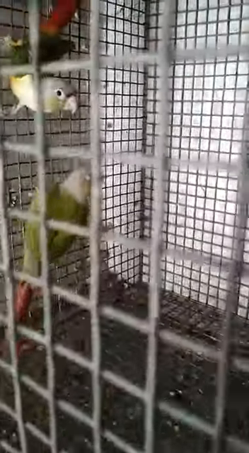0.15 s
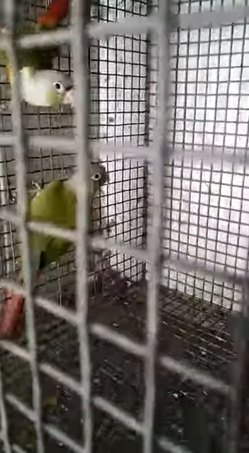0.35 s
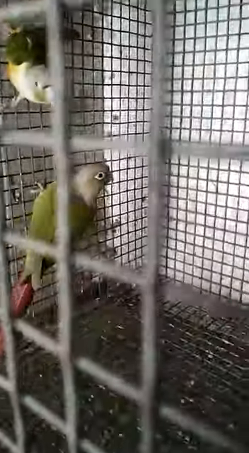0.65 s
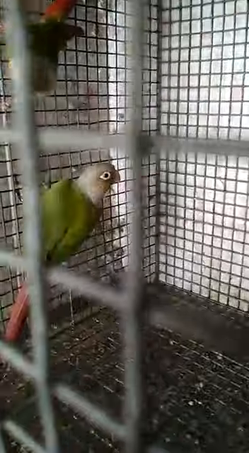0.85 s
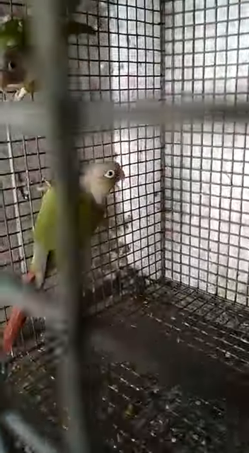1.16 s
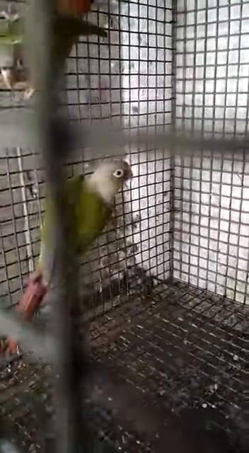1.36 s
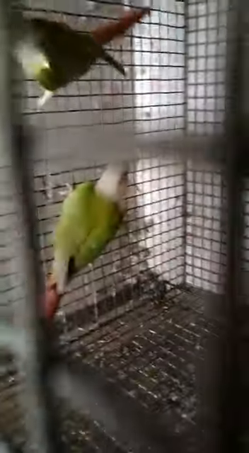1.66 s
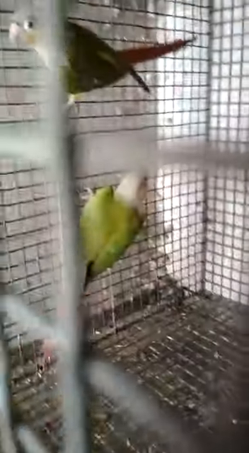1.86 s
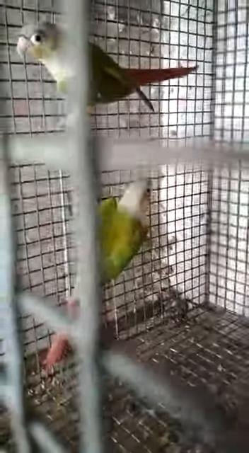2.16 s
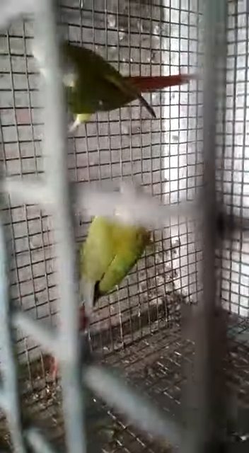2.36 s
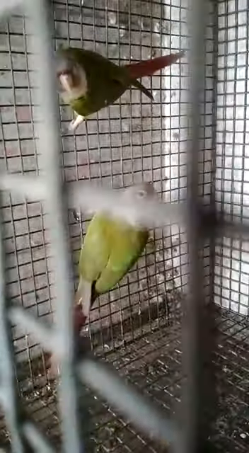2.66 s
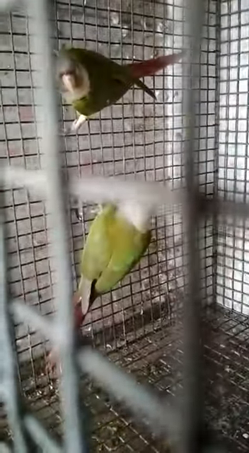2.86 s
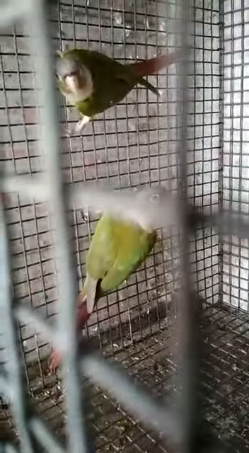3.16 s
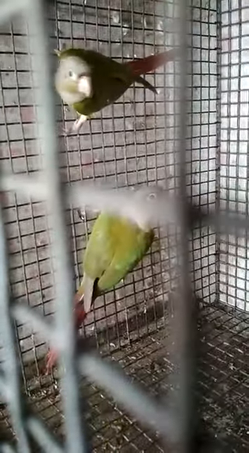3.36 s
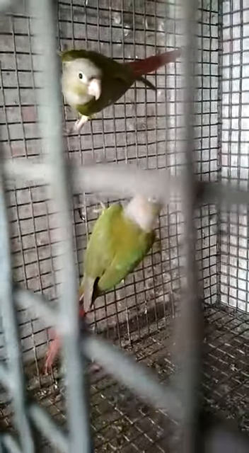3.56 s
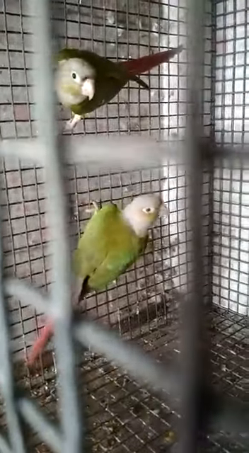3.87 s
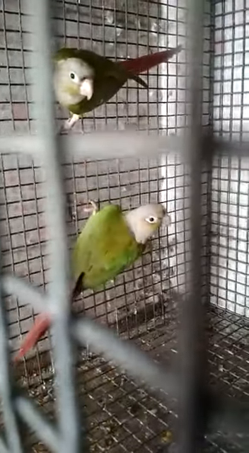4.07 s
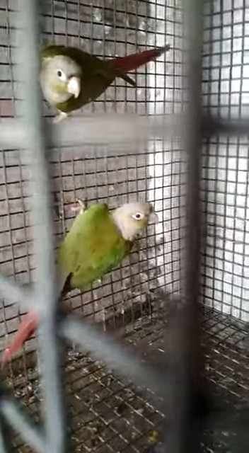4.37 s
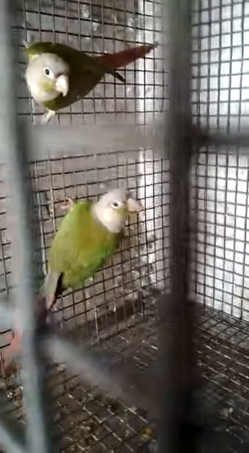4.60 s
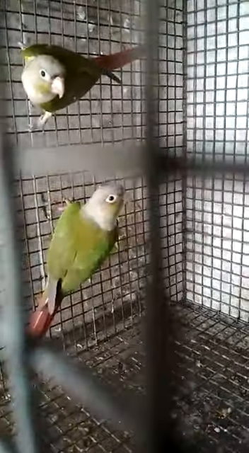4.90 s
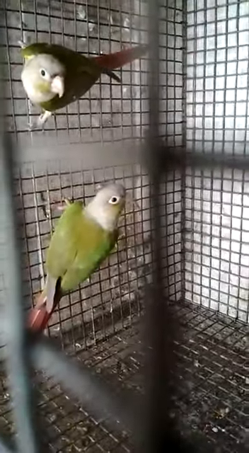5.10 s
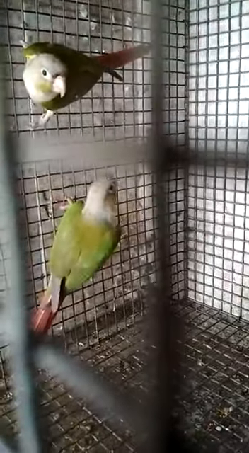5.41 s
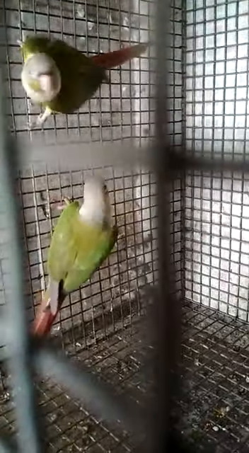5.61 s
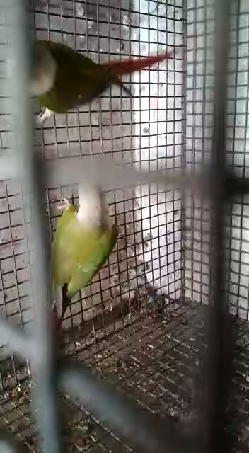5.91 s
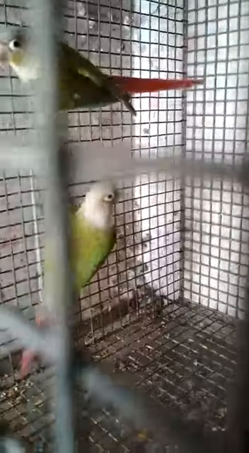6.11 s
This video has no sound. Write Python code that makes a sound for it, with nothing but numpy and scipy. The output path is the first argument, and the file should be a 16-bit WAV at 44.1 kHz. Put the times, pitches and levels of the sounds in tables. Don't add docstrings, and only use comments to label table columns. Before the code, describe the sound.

Two small caged parrots fire off rapid, piercing, raspy squawks very close, then quiet to distant flock chatter over a low fan hum.

```python
import sys
import numpy as np
from scipy import signal
from scipy.fft import rfft, irfft, next_fast_len
from scipy.io import wavfile
from scipy.ndimage import uniform_filter1d, minimum_filter1d, map_coordinates

SR = 44100
rng = np.random.default_rng(int(sys.argv[2]) if len(sys.argv) > 2 else 0)


def bounce(signal):
    frames = np.transpose(np.atleast_2d(signal))
    limited = np.clip(frames, -1, 1)
    pcm = np.round(limited * 32767).astype(np.int16)
    wavfile.write(sys.argv[1], SR, pcm)


def volts_from_db(level):
    exponent = np.asarray(level, float) / 20
    return 10 ** exponent


N = 275625


def unit(x):
    return x / np.sqrt(np.mean(x ** 2) + 1e-20)


def along(points, hz):
    f, v = np.transpose(points)
    return np.interp(np.log(hz + 1), np.log(f + 1), v)


def curve(rows):
    s, value = np.transpose(rows)
    return np.interp(np.arange(N) / SR, s, value)


def swells(rows, rise, fall, rest_db=-80):
    t = np.arange(0, N / SR + .002, .002)
    s, held, db = np.transpose(rows)[..., None]
    before, after = np.clip(s - t, 0, None), np.clip(t - s - held, 0, None)
    level_db = np.max(db - rise * before - fall * after, axis=0)
    return curve(np.transpose([t, np.maximum(level_db, rest_db)]))


def wobble(size, rate):
    return map_coordinates(rng.standard_normal(int(size * rate / SR) + 4), [np.arange(size) * rate / SR])


def filtered(x, response):
    n = x.shape[-1]
    m = next_fast_len(n + 8192)
    return irfft(rfft(x, m) * response(np.fft.rfftfreq(m, 1 / SR)), m)[..., :n]


def syrinx(hz, rasp, first_db=0):
    n = len(hz)
    jitter = (.007 + 0.076 * rasp ** 2) * wobble(n, 600)
    phase = 2 * np.pi * np.cumsum(hz * (1 + jitter)) / SR
    lines = 0
    for k in range(1, 7):
        level_db = (4.0 * rasp + 0.54 * k) * wobble(n, 380) + first_db * (k == 1)
        lines = lines + volts_from_db(level_db) * np.sin(k * phase) * (k * hz < SR / 2.2)
    lines = lines / 1.7 * (1 + .4 * np.sin(phase / 2))
    air = rng.standard_normal(n) * (1 + 1.88 * np.sin(phase)) * volts_from_db(2.47 * wobble(n, 300))
    share = np.clip(rasp, 0, 1) ** 3
    return np.sqrt(1 - share) * lines + np.sqrt(share) * air


# (frequency [Hz], gain [dB])
VOCAL_TRACT = [(900, -18), (1800, -13), (2300, -3), (3000, 1), (3800, 6.5), (5000, 4), (6100, 4.5),
               (6800, 2.5), (8500, -4), (11400, 1.5), (12600, -10), (13500, -12), (15500, -14.5)]


def throat(x, treble_db=0):
    def response(hz):
        beam_db = treble_db / (1 + (9600 / (hz + 1)) ** 12)
        return volts_from_db(along(VOCAL_TRACT, hz) + beam_db)
    return volts_from_db(5.5) * filtered(x, response)


# (frequency [Hz], t60 [s])
WALL_T60 = [(1500, 0.37), (5000, 0.35), (10000, 0.29), (15000, 0.16)]


def room(x, wet_db, stretch, gap):
    hz, t, z = signal.stft(rng.standard_normal((2, SR // 2)), SR, nperseg=256)
    decay = volts_from_db(-60 * t / (stretch * along(WALL_T60, hz)[:, None]))
    tail = signal.istft(z * decay, SR, nperseg=256)[1]
    tail *= 1 - np.exp(-np.arange(tail.shape[1]) / SR / gap)
    tail *= volts_from_db(wet_db) / np.linalg.norm(tail[0])
    tail[:, 0] = 1
    return signal.fftconvolve(x[None], tail, axes=1)


UPPER = {"a": (0.22, 2251, 2280.5, -12, 0.85), "b": (0.21, 2459.5, 2550.5, -6.5, .5),
         "c": (0.1, 2810, 2839, -1.4, 0.29), "d": (0.29, 2930.5, 3039, 0.5, 0.53),
         "e": (0.34, 2840.5, 2419, -5.5, 0.51)}
NEARER = {"a": (0.1, 2229.5, 2261.5, -8, 0.45), "b": (0.44, 2356, 2548, -10.5, 1.6),
          "c": (0.16, 2761, 2760, -6, 0.8), "d": (0.33, 2900, 3031, -0.6, .47),
          "e": (.19, 2880, 2340, 0.57, 0.5)}
HOARSE = {"a": (.115, 2013, 1993, -19, 0.4), "b": (0.2, 2170.5, 2289, 0.8, 0.83),
          "c": (0.36, 2288, 2144, -4, 0.8), "d": (0.1, 2199.5, 2091, -1, 0.6),
          "e": (0.25, 2080, 2073, -5, 0.4)}
# (time [s], length [s], level [dB], treble [dB], room [dB], rungs)
BIRDS = [
    (UPPER, (-4, 0.65), [(-.095, 0.097, -5.5, 3.5, 0.5, "abcde"), (.202, 0.09, -8.5, 3, -1, "abde"), (.455, 0.092, -9.5, 2.3, -1.6, "abcde"), (.716, 0.085, -7.5, 2, -1.5, "bcde"), (.991, 0.084, -10, 3.5, -2.3, "bcde"), (1.254, 0.076, -10, 3, 1.5, "bcde"), (1.517, .093, -9.5, 4.5, -1.2, "abcde"), (6.148, 0.1, -11, 4, -1.8, "abde")]),
    (NEARER, (-7.5, -0.36), [(.863, 0.065, -2.4, 2, -5, "acde"), (1.082, .071, -2.2, 2.5, -5, "acde"), (1.652, 0.06, -3.1, 3.7, -7.5, "acde")]),
    (NEARER, (-6, -1.4), [(2.031, .074, 3, 6.5, -9.5, "abcde")]),
    (HOARSE, (4.2, -1.3), [(5.723, .1, -11.9, 0, -9.5, "abcde")]),
]


def parrots():
    lead = SR // 8
    out = np.zeros((2, N + 2 * SR))
    for ladder, (first_db, pan_db), squawks in BIRDS:
        pan = volts_from_db([[pan_db / 2], [-pan_db / 2]])
        for first, whole_s, level_db, treble_db, wet_db, rungs in squawks:
            call, s = np.zeros(SR // 5), 0
            pace = whole_s / sum(ladder[r][0] for r in rungs)
            for share, start_hz, end_hz, db, rasp in map(ladder.get, rungs):
                overlap_s = .006
                t = np.arange(round((share * pace + overlap_s) * SR)) / SR
                edge = np.clip(np.minimum(t / .003, (t[-1] - t) / .003), 0, 1)
                voice = syrinx(np.linspace(start_hz, end_hz, len(t)), rasp, first_db)
                call[200 + round(s * SR):][:len(t)] += volts_from_db(level_db + db) * edge * voice
                s += share * pace
            heard = room(throat(call, treble_db), wet_db, stretch=0.9, gap=0.00067) * pan
            out[:, lead - 200 + round(first * SR):][:, :heard.shape[1]] += volts_from_db(-0.5) * heard
    return out[:, lead:lead + N]


def far(x):
    return unit(room(x, wet_db=7.5, stretch=0.76, gap=0.0045)[:, :N])


# (time [s], held [s], level [dB], treble over it [dB])
FLOCK = [(1.865, 0.0078, -24.5, -7.5), (1.9, .06, -31, -14), (2.01, .02, -28.5, -3.5),
         (2.22, 0.015, -21.5, -6), (2.4, 0.14, -30, -5), (2.719, 0.025, -35.5, -3), (2.91, 0.27, -36, -3),
         (3.18, 0.035, -27.5, -6.5), (3.34, 0.12, -28, -5.5), (3.658, 0.14, -33.5, -2.5),
         (4.02, 0.074, -47.5, -7.5), (4.2, 0.029, -39, -5), (4.33, 0.064, -36, -6), (4.56, .32, -37.5, -6),
         (4.985, 0.018, -34, -4), (5.11, 0.088, -34, -5.5), (5.25, 0.2, -35.5, -7.5),
         (5.55, 0.099, -48.5, -5.5), (6.04, 0.036, -42.5, 1.7)]


def flock():
    rise, fall, murmur_db = 190, 91, -48
    db = swells([(s, held, db) for s, held, db, _ in FLOCK], rise, fall, murmur_db)
    treble_db = swells([(s, held, db + up) for s, held, db, up in FLOCK], rise, fall, murmur_db - 11.5)
    hz = np.repeat(rng.uniform(2200, 3250, N // 900 + 1), 900)[:N]
    voice = far(throat(syrinx(hz, rasp=.7)))
    body = volts_from_db(db - 2.0) * unit(filtered(voice, lambda f: f < 8000))
    return body + volts_from_db(treble_db) * unit(filtered(voice, lambda f: f >= 8000))


# (time [s], level [dB])
SCREECH = [
    (3.04, -43.5),
    (3.069, -43.5),
    (3.138, -40),
    (3.21, -33),
    (3.274, -37.5),
    (3.33, -40.5),
]
# (frequency [Hz], gain [dB])
SCREECH_COLOUR = [(900, -13), (1400, 3.5), (2200, 6.5), (3000, 3.5), (4300, 5), (5500, -23)]


def screech():
    start, end = (SCREECH[0][0] - .03, -80), (SCREECH[-1][0] + 0.46, -80)
    db = curve([start, *SCREECH, end])
    hoarse = syrinx(700 * (1 + .12 * wobble(N, 30)), rasp=0.8)
    return volts_from_db(db + 5) * far(filtered(hoarse, lambda f: volts_from_db(along(SCREECH_COLOUR, f))))


# (time [s], length [s], pitch [Hz], level [dB])
CHIRPS = [(1.997, 0.019, 3250, -42), (2.299, 0.054, 3260, -40.5), (2.305, 0.056, 4580, -38),
          (2.512, 0.15, 3220, -51.5), (2.788, 0.17, 745, -53), (2.897, .062, 4150, -44.5),
          (2.899, 0.054, 2880, -45.5), (3.615, 0.055, 3354, -42.5), (3.626, .12, 4570, -45.5),
          (3.683, 0.14, 2940, -45.5), (4.006, .02, 3440, -43.5), (4.202, 0.1, 3264, -43.5),
          (4.239, 0.041, 4640, -45.5), (4.328, 0.17, 3290, -48), (4.342, 0.1, 4255, -45.5),
          (4.577, .056, 3250, -46.5), (4.617, 0.03, 4430, -39), (4.676, 0.16, 2744, -48.5),
          (4.779, .12, 4620, -48), (4.946, 0.069, 2875, -54.5), (5.1, .091, 2950, -50),
          (5.189, 0.13, 3120, -45.5), (5.222, 0.097, 4590, -40.5), (5.332, 0.092, 2897, -42),
          (5.593, 0.019, 2940, -49)]


def chirps():
    out = np.zeros((2, N + SR))
    slides = .025 * rng.standard_normal(len(CHIRPS))
    for (s, length, hz, db), slide in zip(CHIRPS, slides):
        n = round(length * SR)
        octave_db = -1 - np.clip(.04 * (hz - 2750), 0, 22)
        glide = np.linspace(hz * (1 - slide), hz * (1 + slide), n)
        phase = 2 * np.pi * np.cumsum(glide * (1 + .045 * wobble(n, 300))) / SR
        note = np.sin(phase) + volts_from_db(octave_db) * np.sin(2 * phase)
        note = note * volts_from_db(db + 1.34 * wobble(n, 101.0)) * np.hanning(n) ** 0.063
        heard = room(note, wet_db=8, stretch=.65, gap=.003)
        out[:, round(s * SR):][:, :heard.shape[1]] += heard
    return out[:, :N]


# (time [s], length [s], start pitch [Hz], end pitch [Hz], level [dB])
TRILL = [
    (3.31, 0.116, 1673, 1701, -31.5),
]


def trill():
    out = np.zeros((2, N + SR))
    for s, length, start_hz, end_hz, db in TRILL:
        t = np.arange(round(length * SR)) / SR
        glide = np.linspace(start_hz, end_hz, len(t))
        phase = 2 * np.pi * np.cumsum(glide * (1 + .032 * wobble(len(t), 200))) / SR
        harmonics_db = (-0.5, 0.5, 1.0, -7)
        tone = sum(volts_from_db(level) * np.sin(k * phase) for k, level in enumerate(harmonics_db, 1))
        throb = np.sin(np.pi * 44 * t) ** 2
        heard = room(volts_from_db(db) * tone * throb, wet_db=2, stretch=0.79, gap=0.0024)
        out[:, round(s * SR):][:, :heard.shape[1]] += heard
    return out[:, :N]


# (time [s], held [s], level [dB])
RUSTLE = [
    (2.37, .1, -58),
    (2.62, 0.14, -35),
    (2.82, 0.17, -37),
    (3.05, .03, -37),
    (3.37, .05, -54),
    (4.19, .02, -55),
    (4.34, .03, -54),
    (4.68, 0.035, -30.5),
    (5.47, .02, -53),
    (6.03, .09, -37.5),
]


def rustle():
    db = swells(RUSTLE, rise=430, fall=390)
    hiss = filtered(rng.standard_normal((2, N)), lambda hz: 1 / (1 + (11500 / (hz + 1)) ** 8))
    return volts_from_db(db + 3.3 * wobble(N, 40)) * unit(hiss) * volts_from_db([[-2], [2.5]])


# (time [s], held [s], level [dB])
HANDLING = [
    (.85, .03, -47),
    (2.0, 0.46, -47),
    (2.62, 0.27, -39.5),
    (3.48, .12, -45.5),
    (4.45, 0.32, -52),
    (5.5, .3, -55),
    (6.08, .05, -40.5),
]


def handling():
    rumble = filtered(rng.standard_normal(N), lambda f: (f > 12) / (1 + (f / 32) ** 5))
    return volts_from_db(swells(HANDLING, rise=90, fall=110, rest_db=-57.5)) * unit(rumble)


# (frequency [Hz], width [Hz], level [dB])
HUM = [(94, 5.8, -53.5), (136, 17, -52), (379.5, 65, -52), (466, 13.6, -56), (742, 38, -59.5),
       (1108, 36, -59.5)]


def fan():
    hum = 0
    for hz, width, db in HUM:
        band = filtered(rng.standard_normal(N), lambda f: np.exp(-((f - hz) / width) ** 2))
        hum = hum + volts_from_db(db) * unit(band)
    t = np.arange(N) / SR
    throb = 1 + 0.33 * np.cos(2 * np.pi * 4.7 * (t - 0.059))
    return hum + volts_from_db(-45.5 + 1.55 * wobble(N, 2.5)) * np.sin(2 * np.pi * 91.6 * t) * throb


# (frequency [Hz], density [dB per Hz])
AIR = [(50, -42), (80, -7.5), (280, -11.5), (470, -14.5), (960, -16), (1800, -17), (3000, -18),
       (4500, -33.5), (7000, -47), (11500, -31.5), (13000, -27), (15400, -44)]
# (frequency [Hz], left-right correlation [-1 to 1])
ALIKE = [(60, 0.94), (180, 0.97), (550, 0.66), (1650, -0.1), (4970, 1), (15000, -0.12)]


def room_air():
    def mid_side(hz):
        turn = np.arccos(np.clip(along(ALIKE, hz), -1, 1)) / 2
        return volts_from_db(along(AIR, hz)) * [np.cos(turn), np.sin(turn)]
    mid, side = filtered(rng.standard_normal((2, N)), mid_side)
    return volts_from_db(-42.5 + .8 * wobble(N, 4.81)) * unit(np.array([mid + side, mid - side]))


# (frequency [Hz], left over right [dB])
PORTS = [(600, 1.5), (1300, 7), (5500, 3), (8100, -2.5), (11500, -10.5), (15000, 1.5)]


def scene():
    def ports(hz):
        delay_s = [[.0004], [0]]
        return volts_from_db(along(PORTS, hz) * [[.5], [-.5]]) * np.exp(-2j * np.pi * hz * delay_s)
    birds = parrots() + flock() + screech() + chirps() + trill()
    return filtered(birds, ports) + rustle() + handling() + fan() + room_air()


# (frequency [Hz], depth [dB])
GAPS = [(1400, 8), (3500, 4.8), (6500, 2.2), (9000, 2.2), (11000, 3.2), (13000, 1.8), (15500, .5)]


def gapped(x, top_db):
    hz, _, z = signal.stft(x, SR, nperseg=2048)
    power = uniform_filter1d(np.abs(z) ** 2, size=10, axis=1) + 1e-20
    level_db = uniform_filter1d(10 * np.log10(power), size=2, axis=2)
    around_db = uniform_filter1d(level_db, size=60, axis=1)
    weak = (level_db < around_db - along(GAPS, hz)[:, None]) & (hz[:, None] > 1400)
    whole_db = 10 * np.log10(power.mean(axis=1, keepdims=True))
    faint = uniform_filter1d(level_db, size=30, axis=1) < whole_db - top_db
    weak |= faint & (hz[:, None] > 11800)
    weak = uniform_filter1d(1. * weak, size=2, axis=2) > 0
    return signal.istft(z * ~weak, SR, nperseg=2048)[1][:, :N]


def low_pass(x):
    return signal.sosfilt(signal.butter(12, 15600, fs=SR, output="sos"), x)


def record(dry):
    x = np.clip(dry, [[-3], [-3.8]], [[2.8], [2.35]])
    x = filtered(x, lambda hz: 1j * hz / (4 + 1j * hz))
    power = uniform_filter1d(np.max(x ** 2, axis=0), size=500, origin=240)
    level_db = 10 * np.log10(np.abs(power) + 1e-12)
    recover = 60 * np.arange(N) / SR
    duck_db = np.maximum.accumulate(np.clip(level_db + 5, 0, None) + recover) - recover
    x = x * volts_from_db(-uniform_filter1d(duck_db, size=200))
    needed = 1.15 / np.clip(np.abs(x), 1.15, None)
    x = x * uniform_filter1d(minimum_filter1d(needed, size=130, axis=1), size=110, axis=1)
    mix = np.clip(gapped(x, top_db=17.0), -1, 1)
    return low_pass(mix)


dry = scene()
out = record(dry)
bounce(out)
```